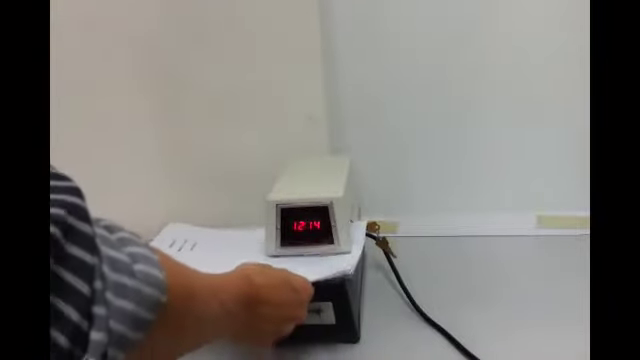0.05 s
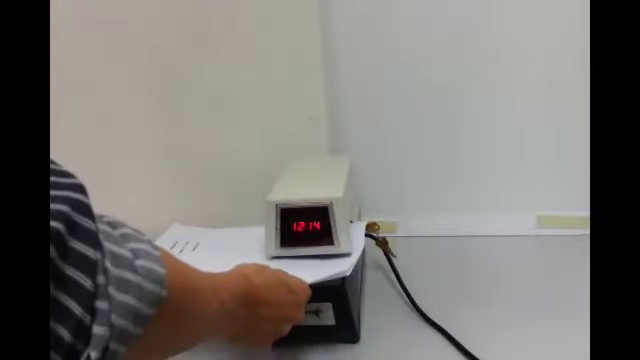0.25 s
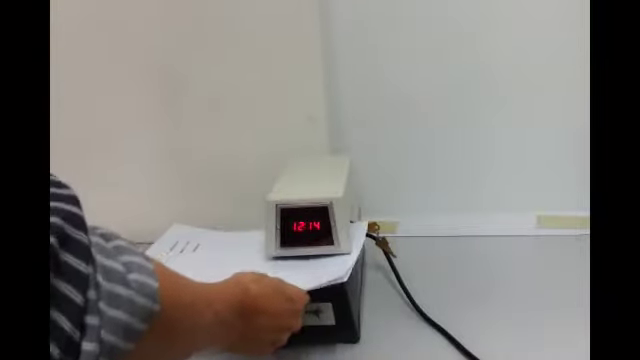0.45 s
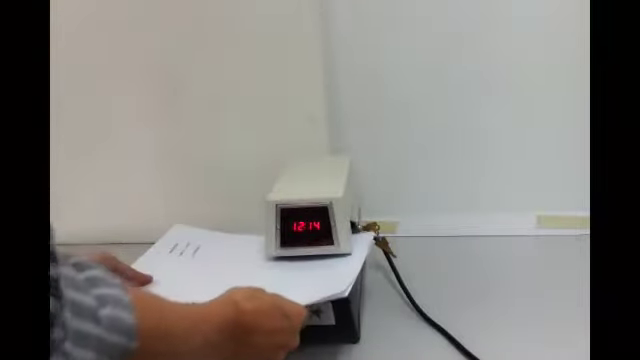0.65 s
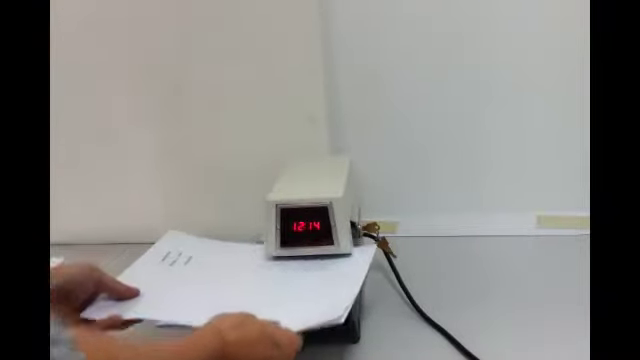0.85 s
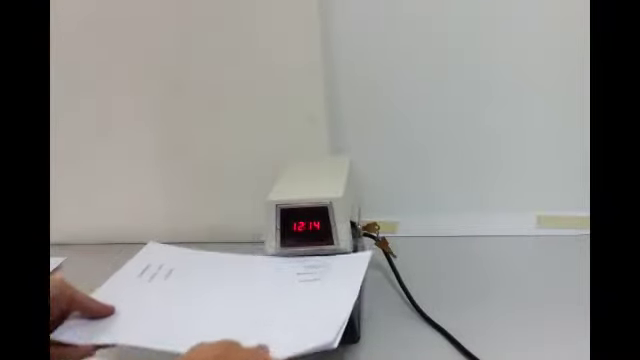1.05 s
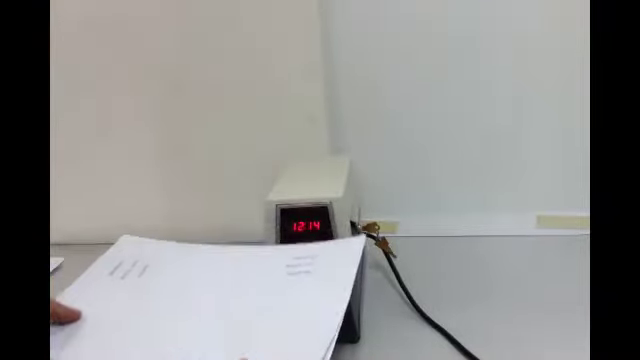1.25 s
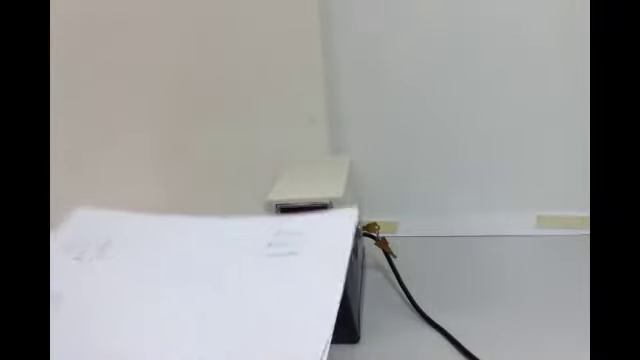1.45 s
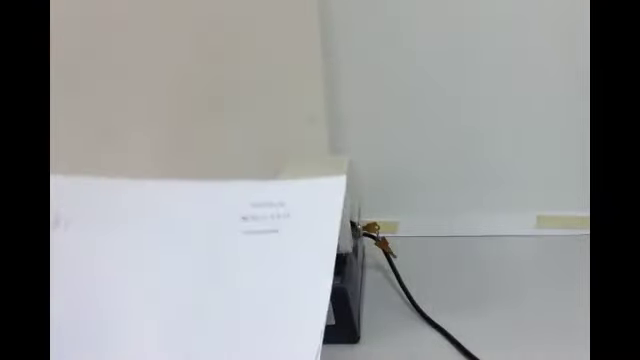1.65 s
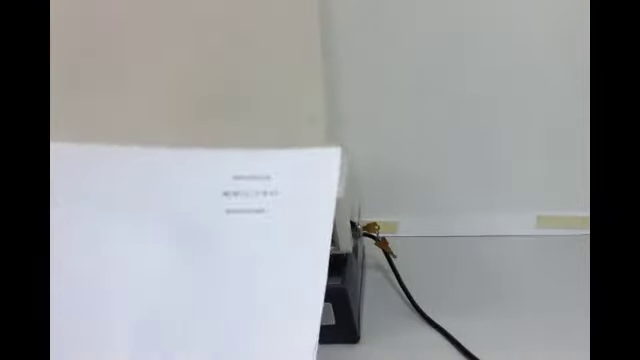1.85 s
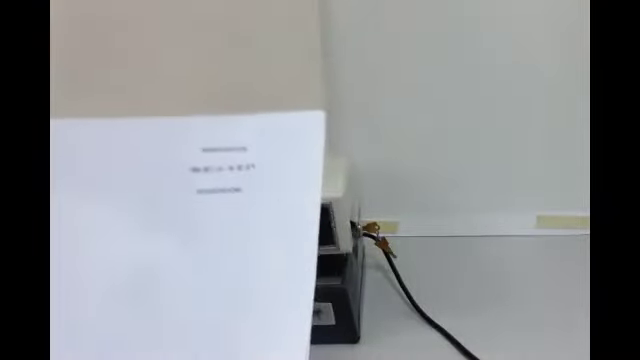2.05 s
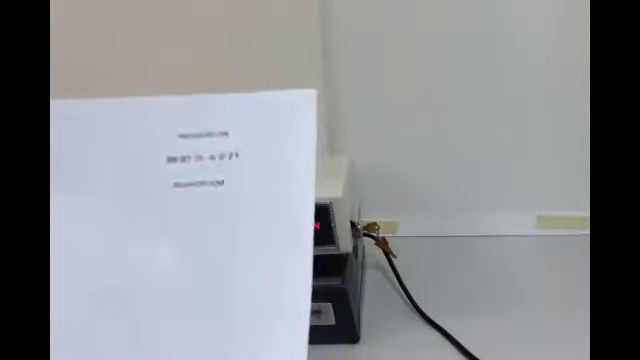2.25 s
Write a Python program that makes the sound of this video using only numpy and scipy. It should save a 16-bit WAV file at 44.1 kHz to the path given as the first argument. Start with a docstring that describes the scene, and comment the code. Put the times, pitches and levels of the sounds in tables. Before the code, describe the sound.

In a small room, a desktop stamp slams down once, loud and close, its metal housing ringing briefly before a soft click. The quiet air hiss dips at the hit and returns, then a sheet of paper rustles faintly.

```python
"""Electric time stamp, one hit

A sheet slides in and trips the stamp. The solenoid slams the type onto the paper, the housing rings
and rattles in a small room, and the mechanism clicks back. The sheet is lifted toward the microphone,
whose gain control ducks the steady room noise at the thunk, holds it down and eases it back."""
import sys
import numpy as np
from scipy import signal
from scipy.fft import rfft, irfft, next_fast_len
from scipy.io import wavfile
from scipy.ndimage import uniform_filter1d, minimum_filter1d, map_coordinates

SR = 44100
rng = np.random.default_rng(int(sys.argv[2]) if len(sys.argv) > 2 else 0)


def to_wav(sig):
    """Store sig (one row per channel, or 1-D mono) as 16-bit WAV at the path in sys.argv[1].

    Samples outside -1..1 are clipped; the rate is SR.
    """
    pcm = np.clip(np.atleast_2d(sig), -1, 1) * 32767
    pcm = np.round(pcm).astype(np.int16)
    wavfile.write(sys.argv[1], SR, pcm.T)  # frames by channels


N = 101429


# Pull-in, main blow, then rattles: t/s, level/dB, extra send to the ring/dB
BLOWS = [(.1982, -14.5, 4), (.2050, 0, -5.5), (.2066, -0.5, -4.5), (.2094, -0.5, -2.5), (.2125, -8, -3),
         (.2222, -9, -4.5), (.244, -14, -3), (.291, -17, -3)]
def stamp():
    """The hero hit: each contact cracks, rings the metal and excites the room; the desk thumps below."""
    comb = works_comb()
    return crack(comb) + room(comb) + desk_thump() + metal_ring()


# Colour of the impact: f/Hz, level/dB
CRACK_COLOUR = [(40, -34.5), (100, -28.5), (250, -19), (450, -6.5), (590, -6.5), (680, 1.5), (850, -9),
                (1030, -2.5), (1250, -7), (1500, 1), (2150, -12), (2650, -2.5), (4000, -5.5), (5500, -9.5),
                (7400, -16), (8400, -31), (10500, -37)]
# Its stereo image: f/Hz, left-right likeness
CRACK_ALIKE = [(100, 0.83), (300, 0.61), (700, 1), (1600, 1), (3000, .2), (9000, 0.32)]
# Its balance: f/Hz, left minus right/dB
CRACK_PAN = [(200, 0), (1000, -3), (2200, 3.5), (4500, -3.5), (9000, -4.5)]
def crack(comb):
    """The attack: a tight noise burst on every contact, coloured by the steel works."""
    force = np.sqrt(sum((amp(db) * fade(s, t60=.028)) ** 2 for s, db, _ in BLOWS))
    noise = unit(filtered(rush(CRACK_COLOUR, CRACK_ALIKE, CRACK_PAN), comb))
    return amp(14.5) * force * noise


# Midrange clang of the housing: f/Hz, level/dB, t60/s
HOUSING_MODES = [(458, -7, 0.19), (521.7, -2.5, 0.31), (553, -6, 0.43), (661.3, 2, .13), (717, -0.5, 0.2),
                 (864.5, -10, 0.28), (937, -8.5, 0.25), (1035, -1, 0.1), (1188, -7.5, 0.13),
                 (1550, -7.5, 0.15), (1795, -11, 0.15), (1890, -10.5, 0.34), (2062, -11.5, 0.14),
                 (2313, -14, .28)]
# Bright ping of the steel works: f/Hz, level/dB, t60/s
STEEL_MODES = [(2606, -2.5, .2), (2610, -4, 0.24), (3191.4, -10, 0.21), (3660, -2, .26), (3750, -5.5, 0.32),
               (4054, -5, .27), (5370, -4, 0.29), (6560, -8.5, .16), (6470, -7.5, 0.075), (7150, -10, .2),
               (8320, -14, .25), (8440, -12.5, .22), (9260, -14, 0.4), (10930, -17.5, 0.14)]
def metal_ring():
    """The body: housing and steel works ring on after the blows."""
    housing = amp(3.5) * ring(HOUSING_MODES, spread_rad=.38, wander_rad=.22)
    steel = amp(-3.5) * ring(STEEL_MODES, spread_rad=.79, wander_rad=.25)
    return housing + steel


def ring(modes, spread_rad, wander_rad):
    """Modes fed by every blow; their phases wander and differ between left and right."""
    out = np.zeros((2, N))
    for hz, db, t60 in modes:
        level = np.sqrt(sum((amp(blow + send) * fade(s, t60)) ** 2 for s, blow, send in BLOWS))
        phase = 2 * np.pi * (hz * since(BLOWS[0][0]) + rng.random()) + wander_rad * wobble(60)
        out += amp(db) * level * np.sin(phase + spread_rad * rng.standard_normal((2, 1)))
    return out


def works_comb(ripple_db=4, spacing_hz=50.03):
    """Many small steel parts: an uneven comb of resonances, mostly in the treble (gain against Hz)."""
    knots = rng.standard_normal(1024)
    depth = lambda hz: ripple_db * along([(600, 0), (1400, .079), (2200, 1), (6000, .81), (9000, 0)], hz)
    ripple = lambda hz: np.tanh(map_coordinates(knots, [hz / spacing_hz], mode="wrap"))
    return lambda hz: amp(depth(hz) * ripple(hz))


# Knocks on the desk: t/s, f/Hz, level/dB, t60/s
THUMPS = [(0.205, 137, -11, .25), (0.206, 335.5, -6, .2), (.248, 237.2, -9.5, 0.22),
          (0.261, 88, -27.5, 0.34), (0.636, 175.3, -38, 0.39)]
def desk_thump():
    """The low-end weight: the machine rocks on the desk and settles."""
    return sum(amp(db) * fade(s, t60, attack_s=.004) * np.sin(2 * np.pi * hz * since(s))
               for s, hz, db, t60 in THUMPS)


# The swell into the hit: t/s, level/dB, rise/s
SWELL = (.187, -19, 0.0091)
# Its dull colour: f/Hz, level/dB
SWELL_COLOUR = [(60, -13), (150, -3.5), (600, -1), (1200, -15.5), (3500, -15), (6000, -32.5)]
def lead_in_swell():
    """A brief, dull swell of noise just before the hit, cut off by the main blow."""
    start, db, rise_s = SWELL
    rise = np.minimum(since(start) / rise_s, 1) ** 2
    choke = np.exp(-since(BLOWS[1][0]) / .0041)
    return amp(db) * rise * choke * rush(SWELL_COLOUR, CRACK_ALIKE, CRACK_PAN)


# Trigger clicks: t/s, level/dB
CLICKS = [(.163, -36), (.616, -34.5), (.658, -55)]
# Their thin, bright colour: f/Hz, level/dB
CLICK_COLOUR = [(170, -4.5), (400, -15.5), (1500, -10), (3100, -1), (3800, -8.5), (4500, 1.5), (6100, -2.5),
                (7400, -13), (10300, -10.5)]
def switch():
    """Light clicks as the trigger trips and resets, each with a little room tail."""
    level = sum(amp(db) * (fade(s, t60=.04) + amp(-4) * fade(s, t60=.47, attack_s=.008))
                for s, db in CLICKS)
    return level * rush(CLICK_COLOUR, ROOM_ALIKE, ROOM_PAN)


# The sheet going in: rise from t/s, decay from t/s, level/dB
FEED = (.174, 0.17, -36.5)
# Colour of that scuff: f/Hz, level/dB
FEED_COLOUR = [(300, -12), (1200, -6), (2500, -4.5), (4000, 0), (6000, -7), (10000, -20)]
# Swell of the lifted sheet: t/s, level/dB
LIFT = [(2.0, -71), (2.09, -56.5), (2.13, -43), (2.22, -45), (2.3, -38)]
# Colour of that swish: f/Hz, level/dB
LIFT_COLOUR = [(60, -14), (120, -6), (260, 0), (600, -1.5), (1050, -4), (1220, -31), (1480, 4), (1660, 1.5),
               (1790, -10.5), (1950, -3.5), (2700, -2.5), (3600, -18.5), (9000, -29)]
def paper():
    """The sheet scuffs briefly into the slot and later swishes up toward the microphone."""
    rise_at, decay_at, db = FEED
    feed = amp(db) * (1 - np.exp(-since(rise_at) / .003)) * np.exp(-since(decay_at) / .004)
    lift = amp(np.interp(since(0), *np.transpose(LIFT), left=-120) + 1.38 * wobble(45))
    return feed * rush(FEED_COLOUR, ROOM_ALIKE, ROOM_PAN) + lift * rush(LIFT_COLOUR, AIR_ALIKE, AIR_PAN)


# Colour of the reverb: f/Hz, level/dB
ROOM_COLOUR = [(40, -36.5), (100, -25.5), (170, -22), (280, -11), (500, -3), (700, -5.5), (830, -11),
               (1000, -8.5), (1800, -8.5), (2200, -15), (2600, -9.5), (4000, -11), (5700, -12.5),
               (7000, -17), (10500, -24.5)]
# Its decay: f/Hz, t60/s
ROOM_T60 = [(100, .45), (500, .35), (2000, 0.36), (5000, 0.36), (10000, 0.28)]
# Its stereo image: f/Hz, left-right likeness
ROOM_ALIKE = [(100, .9), (250, .65), (500, 1), (1200, .25), (3000, .25), (9000, 0)]
# Its balance: f/Hz, left minus right/dB
ROOM_PAN = [(200, 0), (1000, 0.5), (2200, 1), (4500, -5), (9000, -2)]
def room(comb, build_s=.006):
    """The tail: a small room's diffuse answer to the blows, each frequency dying at its own speed."""
    noise = unit(filtered(rush(ROOM_COLOUR, ROOM_ALIKE, ROOM_PAN), comb))
    hz, t, bands = signal.stft(noise, SR, nperseg=128)
    t60 = along(ROOM_T60, hz)[:, None]
    ages = [(np.maximum(t - s, 0), db) for s, db, _ in BLOWS]
    power = sum((amp(db) * (1 - np.exp(-age / build_s)) * np.exp(-np.log(1000) * age / t60)) ** 2
                for age, db in ages)
    return amp(4) * signal.istft(bands * np.sqrt(power), SR, nperseg=128)[1][:, :N]


# Colour of the moving air: f/Hz, level/dB
AIR_COLOUR = [(30, -42.5), (55, -31), (90, -18), (190, -7.5), (280, -8), (345, -3), (440, -10), (550, -6),
              (640, -10), (760, -8), (1130, -13), (1500, -15), (2100, -17), (3500, -18.5), (6000, -23),
              (10500, -29)]
# Its stereo image: f/Hz, left-right likeness
AIR_ALIKE = [(60, 0.97), (130, 1), (290, .85), (640, .4), (1410, -0.3), (3100, 0), (9000, 0)]
# Its balance: f/Hz, left minus right/dB
AIR_PAN = [(200, -1), (400, 1.5), (1300, 0.5), (4400, -2.5), (9000, -1)]
def ventilation(hum_hz=353):
    """The bed: steady rushing air with a wavering hum."""
    hum = amp(-55.5 + 3.5 * wobble(11)) * np.sin(2 * np.pi * hum_hz * since(0) + 1.2 * wobble(22))
    return amp(-42) * rush(AIR_COLOUR, AIR_ALIKE, AIR_PAN) + hum


def rush(colour, alike, pan):
    """Stereo noise of rms 1 with a colour, a width and a balance."""
    def shape(hz):
        width = np.arccos(np.clip(along(alike, hz), -1, 1)) / 2
        return amp(along(colour, hz)) * [np.cos(width), np.sin(width)]
    mid, side = filtered(rng.standard_normal((2, N)), shape)
    balance = lambda hz: amp(np.outer([.5, -.5], along(pan, hz)))
    return unit(filtered(np.array([mid + side, mid - side]), balance))


def amp(db):
    """Decibels to gain."""
    return 10 ** (np.asarray(db) / 20)


def unit(x):
    """Scaled to rms 1."""
    return x / np.sqrt(np.mean(x ** 2) + 1e-20)


def along(points, hz):
    """A curve through (f/Hz, value) points on a log frequency axis."""
    f, v = np.transpose(points)
    return np.interp(np.log(hz + 1), np.log(f + 1), v)


def since(s):
    """Seconds since s, zero before."""
    return np.maximum(np.arange(N) / SR - s, 0)


def fade(s, t60, attack_s=.0003):
    """A percussive envelope: a rise at time s and an exponential decay."""
    return (1 - np.exp(-since(s) / attack_s)) * np.exp(-np.log(1000) * since(s) / t60)


def wobble(rate):
    """A smooth random curve, rate knots a second."""
    return map_coordinates(rng.standard_normal(512), [np.arange(N) * rate / SR], mode="wrap")


def filtered(x, response):
    """EQ by a function giving gain against Hz."""
    size = next_fast_len(N + SR // 4)
    return irfft(rfft(x, size) * response(np.fft.rfftfreq(size, 1 / SR)), size)[..., :N]


def low_pass(x, hz):
    """A steep cut above hz."""
    return signal.sosfilt(signal.ellip(12, .1, 90, hz, fs=SR, output="sos"), x)


def gain_control(x, limit_db=-6.5, lookahead_s=.011, hold_s=.85, recover_s=.16):
    """A gain that ducks just ahead of a loud sound, holds, then eases back up."""
    power = np.abs(uniform_filter1d(np.mean(x ** 2, axis=0), size=660))
    duck_db = np.minimum(limit_db - 10 * np.log10(power + 1e-12), 0)
    hold, ahead = int(hold_s * SR), int(lookahead_s * SR)
    held = minimum_filter1d(np.pad(duck_db, (0, ahead)), hold, origin=(hold - 1) // 2, mode="constant")
    held = uniform_filter1d(held[ahead:], size=350)
    pole = np.exp(-1 / (recover_s * SR))
    eased = signal.lfilter([(1 - pole) ** 2], [1, -2 * pole, pole ** 2], held)
    return amp(np.minimum(held, eased))


def scene():
    """The mix: the hit, clicks and paper over the ventilation bed."""
    return lead_in_swell() + stamp() + switch() + paper() + ventilation()


def record(dry):
    """A narrow-band microphone with gain control; the loudest peaks are hard-clipped."""
    narrow = low_pass(dry, hz=10700)
    clipped = np.clip(narrow * gain_control(narrow), -1, 1)
    return low_pass(clipped, hz=15800)


dry = scene()
out = record(dry)
to_wav(out)
```